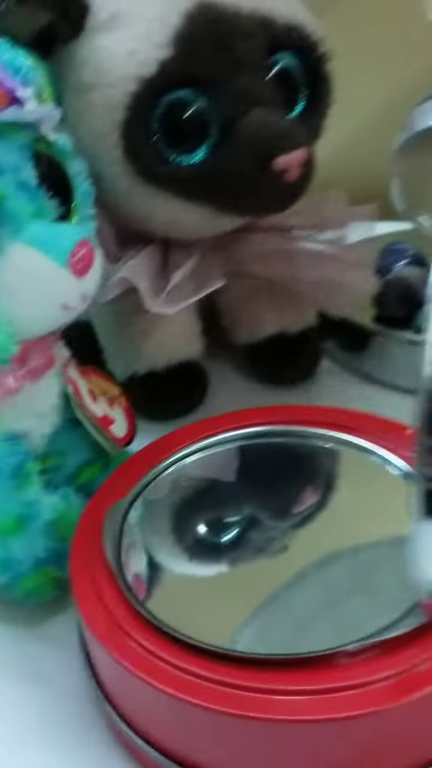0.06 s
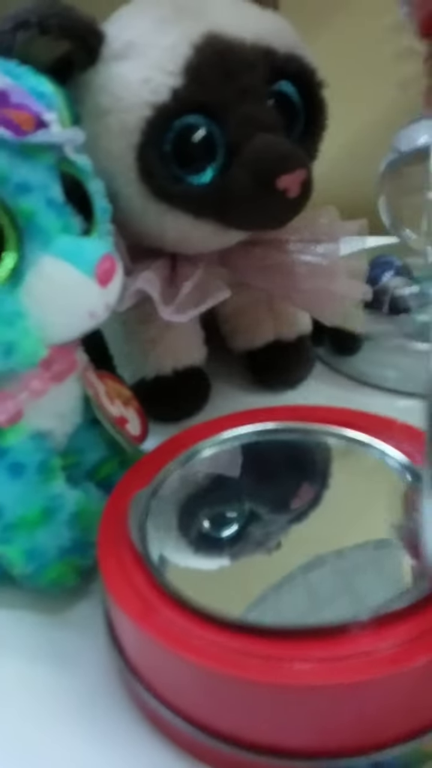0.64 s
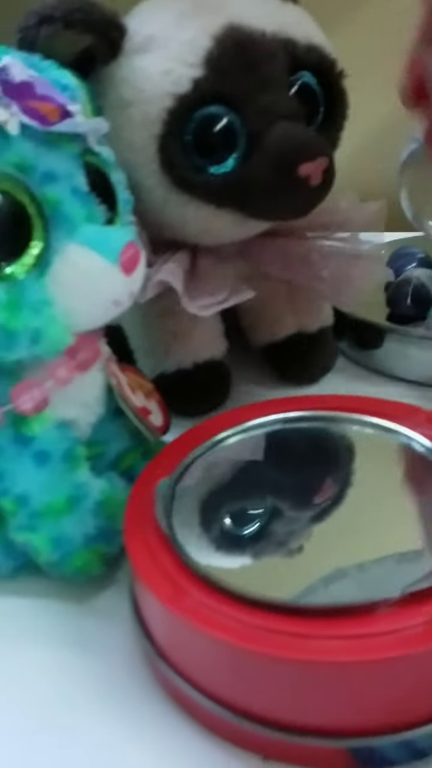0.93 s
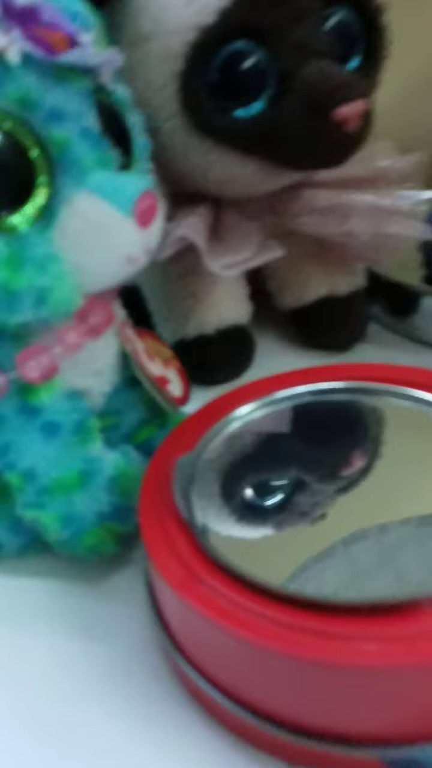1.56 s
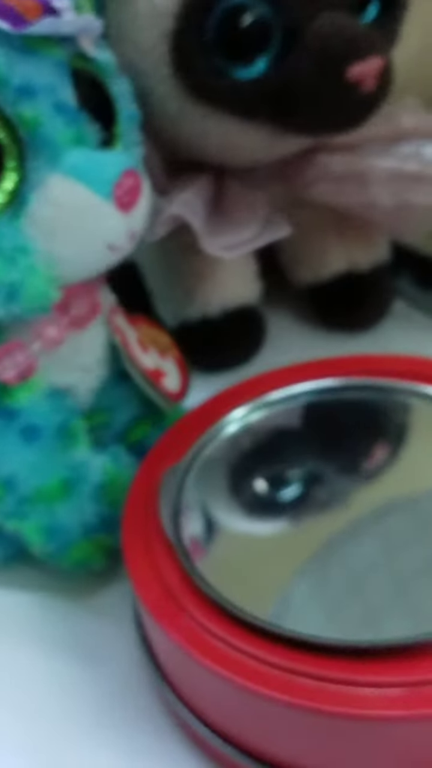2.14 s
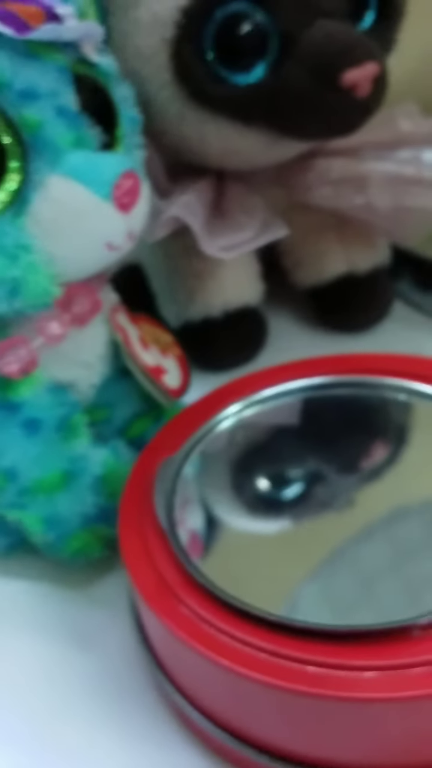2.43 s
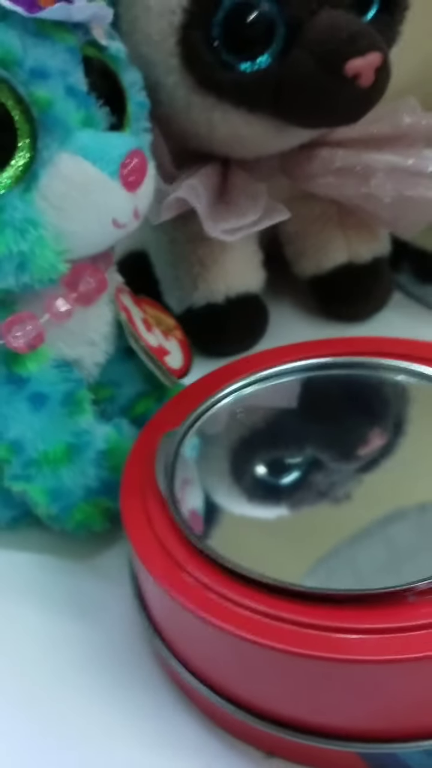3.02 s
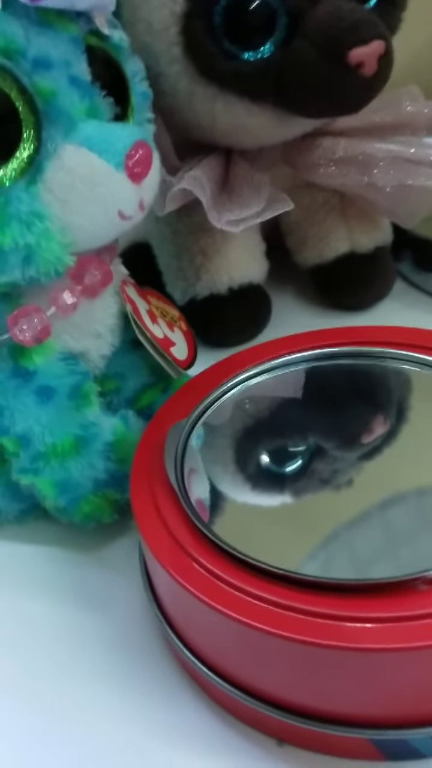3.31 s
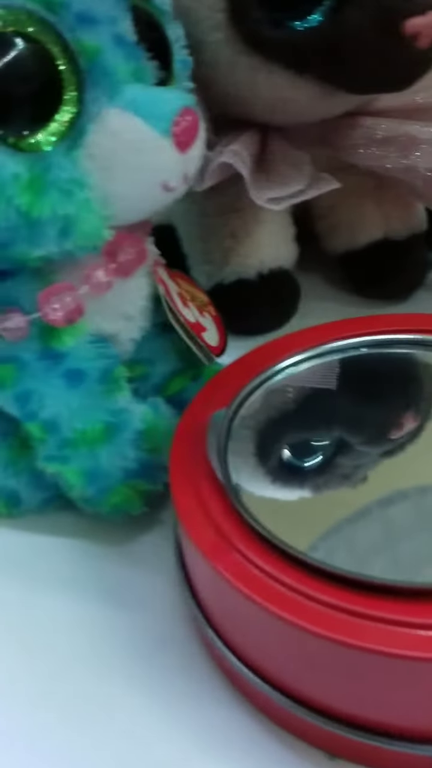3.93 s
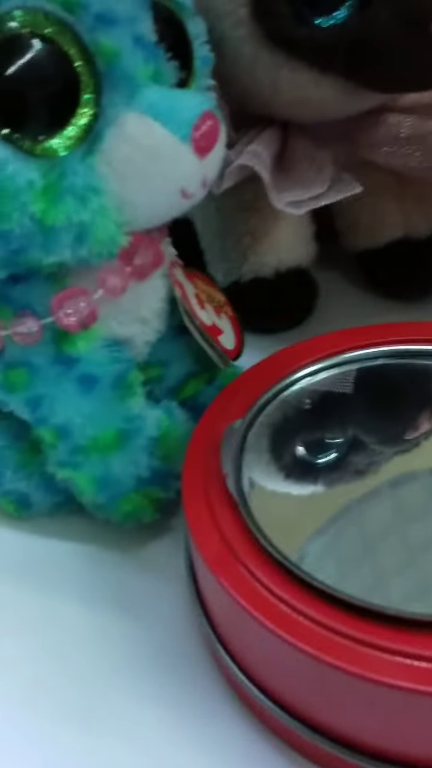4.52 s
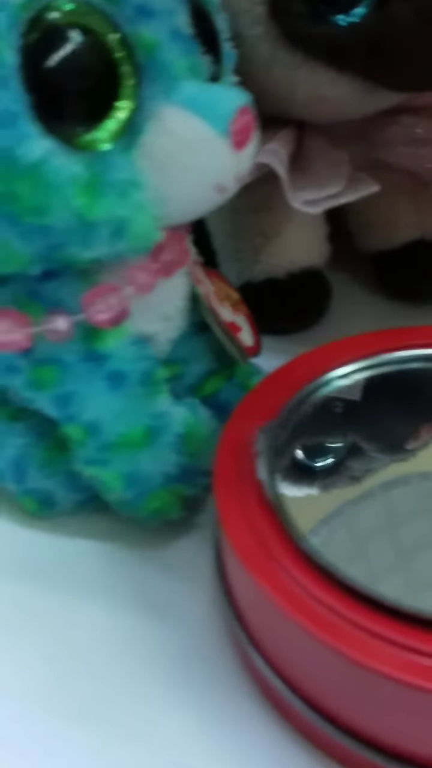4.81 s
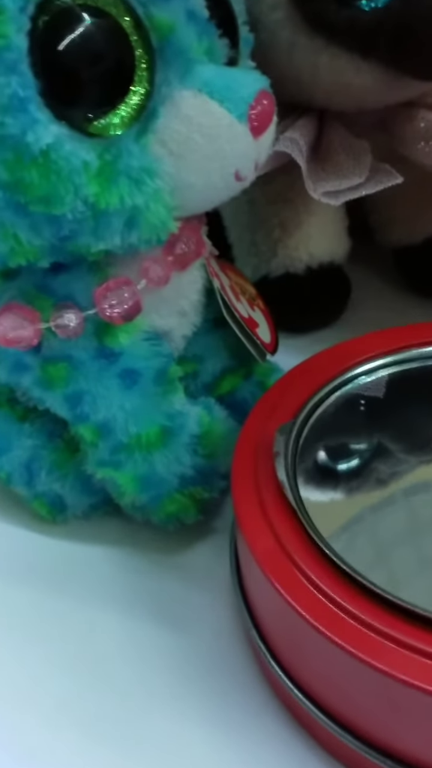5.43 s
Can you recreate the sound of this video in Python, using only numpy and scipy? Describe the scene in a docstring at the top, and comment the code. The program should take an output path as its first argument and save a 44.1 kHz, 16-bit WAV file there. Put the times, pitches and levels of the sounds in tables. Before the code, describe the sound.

Close to a stereo microphone in a small, quiet room, hands move trinkets about on a table. A cluster of metallic clinks sounds on the right as beads land in a tin, followed by uneven scraping and soft bumps. Sparse little clicks give way to a quick, dry clatter of beads. Last, a tin lid lands sharply near the centre, wobbles on its rim and scrapes along. A faint hum lies behind.

```python
"""Beads and small tins on a table

Close up, a little right of a stereo microphone, beaded trinkets roll, click and rub. Beads drop into
an open metal tin, which rings and then scrapes in tiny slips as it is pushed along; later a lid is
clapped down and slid over the table. Hands brush about, and soft bumps wake the table top's low modes.
A small, quiet room with a low hum lies behind."""
import sys
import numpy as np
from scipy import signal
from scipy.fft import rfft, irfft, next_fast_len
from scipy.io import wavfile
from scipy.ndimage import uniform_filter1d

SR = 44100
rng = np.random.default_rng(int(sys.argv[2]) if len(sys.argv) > 2 else 0)


def log_audio(samples):
    """Write samples as a 16-bit WAV file to the path given in sys.argv[1]."""
    # one column per channel
    frames = np.atleast_2d(samples).T
    # limit to full scale, then quantise
    limited = np.clip(frames, -1, 1)
    pcm = np.round(limited * 32767).astype(np.int16)
    wavfile.write(sys.argv[1], SR, pcm)


N = 245240
TIME = np.arange(N) / SR


def amp(db):
    """Decibels to gain."""
    return 10 ** (np.asarray(db) / 20)


def unit_rms(x):
    """Scales to rms 1."""
    return x / np.sqrt(np.mean(x ** 2) + 1e-20)


def curve_at(points, hz):
    """Reads a table on a log-frequency axis."""
    f, value = np.transpose(points)
    return np.interp(np.log(hz + 1), np.log(f + 1), value)


def add(mix, start_s, sound):
    """Mixes a stereo sound in at its start time."""
    part = mix[:, max(round(start_s * SR), 0):][:, :sound.shape[1]]
    part += sound[:, :part.shape[1]]


def placed(x, right_db):
    """Leans a sound to the right of the microphone."""
    return x * amp([[-right_db / 2], [right_db / 2]])


def wavering(db, size):
    """A random gain that drifts over `size` samples."""
    return amp(db * unit_rms(uniform_filter1d(rng.standard_normal(N), size)))


def strokes(rows, attack_s, release_db_per_s):
    """Pressure over time: each stroke builds up, lasts for its length and dies away."""
    power = np.zeros(N)
    for start, length, db in rows:
        rise = np.clip((TIME - start) / attack_s, 0, 1)
        power += (rise * amp(db - release_db_per_s * np.maximum(TIME - start - length, 0))) ** 2
    return np.sqrt(power)


# Likeness of left and right at the microphone: f/Hz, coherence
MIC_COHERENCE = [(50, .9), (800, .985), (2500, .84), (5000, .55), (15000, .5)]


def stereo_noise(size, lag=0):
    """White noise at two microphone ports, most alike in the bass; the left is `lag` samples late."""
    padded = next_fast_len(size)
    hz = np.fft.rfftfreq(padded, 1 / SR)
    right, unrelated = np.exp(2j * np.pi * rng.random((2, len(hz))))
    coherence = np.clip(curve_at(MIC_COHERENCE, hz), 0, 1)
    left = coherence * right + np.sqrt(1 - coherence ** 2) * unrelated
    left *= np.exp(-2j * np.pi * hz * lag / SR)
    return unit_rms(irfft(np.array([left, right]), padded)[:, :size])


def coloured_noise(colour):
    """Steady stereo noise with a given spectrum."""
    gain = amp(curve_at(colour, np.fft.rfftfreq(N, 1 / SR)))
    return irfft(rfft(stereo_noise(N)) * gain, N)


def resonator(colour, modes, treble_db, body_db, size=8192):
    """An object's impulse response: modes on a broad colour, with unit gain over 1.5-5 kHz."""
    hz = np.fft.rfftfreq(size, 1 / SR)
    peaks = 1 + sum((amp(db) ** 2 - 1) / (1 + (2 * (hz - f) / width) ** 2) for f, width, db in modes)
    shelves_db = treble_db / (1 + (5200 / (hz + 1)) ** 4) + body_db / (1 + (hz / 1650) ** 10)
    gain = amp(curve_at(colour, hz) + shelves_db) * np.sqrt(np.maximum(peaks, .1))
    gain /= np.sqrt(np.mean(gain[(hz > 1500) & (hz < 5000)] ** 2))
    cepstrum = irfft(np.log(gain))
    cepstrum[1:size // 2] *= 2  # minimum phase, so the ring follows the contact
    cepstrum[size // 2 + 1:] = 0
    return irfft(np.exp(rfft(cepstrum)))


def knocks(rows, colour, modes, body_db, rise_s, crack_s, ring_s, ring_db, detune, lag, size=4096):
    """Each contact is a short crack and a dense dying ring, its modes a little different each time."""
    scatter_db, body_per_treble = 2, 0.13  # a sharp contact has more low knock and less ring
    out, t = np.zeros((2, N)), np.arange(size) / SR
    envelope = (1 - np.exp(-t / rise_s)) * (np.exp(-t / crack_s) + amp(ring_db) * np.exp(-t / ring_s))
    for start, db, treble_db in rows:
        struck = [(f * (1 + detune * rng.normal()), width, height + scatter_db * rng.normal())
                  for f, width, height in modes]
        response = resonator(colour, struck, treble_db, body_db + body_per_treble * treble_db)
        crack = stereo_noise(size, lag) * envelope
        crack *= np.sqrt(.005 * SR / np.sum(crack ** 2, 1, keepdims=True))  # energy of 5 ms at rms 1
        add(out, start, amp(db) * signal.fftconvolve(crack, response[None], axes=1))
    return out


def friction(pressure, response, slips_per_s, spread_db, clump_db, smooth, lag):
    """Tiny uneven slips come in clumps over smooth rubbing; lighter pressure sounds duller."""
    slipping = rng.random(N) < slips_per_s / SR
    strength = amp(spread_db * np.minimum(rng.exponential(1, N), 2))
    slips = slipping * strength * wavering(clump_db, size=500)
    power = signal.lfilter([1], [1, -np.exp(-2000 / SR)], slips ** 2)  # each slip lasts about 1 ms
    drive = unit_rms(stereo_noise(N, lag) * np.sqrt(power + smooth * power.mean())) * pressure
    dull = signal.sosfiltfilt(signal.butter(1, 4500, fs=SR, output="sos"), drive)
    treble = (drive - dull) * (pressure / pressure.max()) ** 0.42
    return signal.oaconvolve(dull + treble, response[None], axes=1)[:, :N]


# Room tone behind the table: f/Hz, relative level/dB
ROOM_TONE_COLOUR = [(20, -24), (55, 0), (85, -7.5), (130, -5.5), (200, -16.5), (450, -21.5), (1200, -29.5),
                    (3000, -33), (15500, -32)]


def room_tone():
    """Low room rumble, a faint electric hum and microphone hiss."""
    hum_hz = 120.2
    air = unit_rms(coloured_noise(ROOM_TONE_COLOUR))
    hum = unit_rms(np.sin(2 * np.pi * hum_hz * TIME))
    return placed(amp(-70) * air + amp(-72.5) * hum, right_db=6.0)


# Hands brushing the table and soft toys, close by: t/s, length/s, level/dB
HAND_STROKES = [(0, 0.41, -67.5), (.7, 0.02, -50), (.87, 0.29, -61), (1.36, .24, -55.5),
                (2.17, 0.11, -63.5), (2.88, 0.45, -77), (4.16, 0.37, -59), (4.3, 0.29, -58.5),
                (4.78, 0.66, -64.5)]


def hands():
    """Dull, uneven brushing of skin and cloth."""
    colour = [(30, -24.5), (120, 9), (350, 2), (700, -5), (1300, -22.5), (3000, -16.5), (15000, -31)]
    rub = unit_rms(coloured_noise(colour) * wavering(2, size=1200))
    pressure = strokes(HAND_STROKES, attack_s=0.09, release_db_per_s=172)
    return placed(rub * pressure, right_db=6.5)


# Broad spectrum of the beads, close up: f/Hz, relative level/dB
BEAD_SPECTRUM = [(100, -21.5), (450, -4.5), (1200, -16.5), (2000, -15.5), (3500, -10.5), (6000, -1),
                 (10000, 3.5), (14500, 5), (16500, -22)]
# Their resonances and one notch: f/Hz, width/Hz, height/dB
BEAD_RESONANCES = [(1960, 170, -22), (2406, 214, 24), (2567, 600, 26), (3600, 250, 10.5), (8030, 160, 13.5),
                   (12000, 1700, 0.5)]
# Beads rolling over each other: t/s, length/s, level/dB
BEAD_ROLLING = [(.2, 0.14, -68), (.703, 0.02, -49.5), (2.2, 0.15, -69.5), (3.1, 0.23, -69.5),
                (4.21, 0.21, -55.5), (4.315, 0.3, -42.5), (4.745, 0.035, -48.5)]
# Beads clicking together: t/s, level/dB, treble/dB
BEAD_CONTACTS = [(.2119, -51.5, 20.5), (.2364, -51.5, 10), (.7053, -44, -7.5), (2.1051, -62.5, 14),
                 (2.1745, -59.5, 15), (2.2423, -51.5, -3.5), (2.361, -37.5, -7), (3.0914, -50, -7),
                 (3.1283, -52.5, -2.5), (3.1976, -49, 4.5), (3.2645, -38, -0.5), (3.3079, -39, -10),
                 (4.1657, -43.5, -16), (4.2146, -29, -10), (4.3378, -22.5, -6), (4.364, -24.5, -13),
                 (4.385, -16, -9), (4.3932, -20, -3), (4.4416, -30, -3), (4.456, -30.5, -1),
                 (4.466, -35, -3), (4.49, -26.5, -2), (4.4952, -24, -5), (4.5125, -27, 4),
                 (4.5186, -20, -3.5), (4.553, -22, 0.5), (4.569, -25.5, -11), (4.6042, -39.5, -3),
                 (4.6556, -41, -2), (4.7533, -46.5, 4.5), (4.8347, -47, 2.5)]


def beads():
    """Hard beads just right of centre: bright, dry clicks and a loose rattle as they roll."""
    clicks = knocks(BEAD_CONTACTS, BEAD_SPECTRUM, BEAD_RESONANCES, body_db=-6.5,
                    rise_s=.0007, crack_s=.0017, ring_s=.009, ring_db=-21, detune=.04, lag=3)
    response = resonator(BEAD_SPECTRUM, BEAD_RESONANCES, treble_db=-4.5, body_db=8)
    pressure = strokes(BEAD_ROLLING, attack_s=.01, release_db_per_s=245.5)
    rattle = friction(pressure, response, slips_per_s=200, spread_db=4.5, clump_db=3.5, smooth=.06, lag=3)
    return placed(clicks + rattle, right_db=3.5)


# Beads rubbing, at the same spot: t/s, length/s, level/dB, f/Hz
BEAD_RUBBING = [(0.242, 0.067, -56.5, 2670), (0.341, 0.0083, -54, 2640), (2.337, 0.027, -57.5, 2430),
                (2.464, 0.1, -75, 2490), (4.16, 0.047, -62, 2650), (4.487, 0.084, -45.5, 2500)]


def bead_chatter(width_hz=620):
    """Beads stick and slip against each other, each rub ringing at its own pitch."""
    slips = friction(np.ones(N), np.ones(1), slips_per_s=170, spread_db=3, clump_db=1.5,
                     smooth=.15, lag=3)
    out = np.zeros((2, N))
    for start, length, db, hz in BEAD_RUBBING:
        b, a = signal.iirpeak(hz, hz / width_hz, fs=SR)
        ring = unit_rms(signal.lfilter(b, a, signal.lfilter(b, a, slips)))
        out += ring * strokes([(start, length, db)], attack_s=0.0031, release_db_per_s=562)
    return placed(out, right_db=3.5)


# Low modes of the table top: f/Hz
TABLE_MODES = [85, 137, 172, 206, 280, 320, 470, 505, 590, 660, 880, 1005]
# Hands and tins bumping it, near right: t/s, level/dB, centre f/Hz
TABLE_BUMPS = [(0.734, -59, 178), (.945, -40.5, 422), (1.356, -38.5, 248), (1.375, -48, 132),
               (1.534, -46.5, 600), (3.004, -72, 750), (3.197, -67, 1250), (4.258, -51, 149),
               (4.364, -45.5, 680), (4.602, -54.5, 650), (4.792, -40, 224), (4.892, -45.5, 604),
               (4.933, -41, 174), (4.944, -44, 467), (5.007, -44.5, 186), (5.534, -47.5, 715)]


def table_bumps(t60_s=.18, size=16384):
    """A soft blow gives a dull thud and wakes the table's modes around a centre set by its softness."""
    out, t, hz = np.zeros((2, N)), np.arange(size) / SR, np.array(TABLE_MODES)
    envelope = (1 - np.exp(-t / 0.0023)) * amp(-60 * t / t60_s)
    for start, db, centre_hz in TABLE_BUMPS:
        weights = 1 / (1 + (np.log(hz / centre_hz) / 0.45) ** 2)
        detuned_hz = hz * rng.normal(1, 0.026, len(hz))
        modes = np.sin(2 * np.pi * (np.outer(detuned_hz, t) + rng.random((len(hz), 1))))
        band = signal.butter(3, [centre_hz / 3, centre_hz * 1.79], "bandpass", fs=SR, output="sos")
        toneless = signal.sosfilt(band, stereo_noise(size))
        thud = (unit_rms(weights @ modes) + amp(-4) * unit_rms(toneless)) * envelope
        onset_rms = np.sqrt(np.mean(thud[:, t < .03] ** 2))
        add(out, start, amp(db) * thud / onset_rms)
    return placed(out, right_db=6.5)


# Broad spectrum of the open tin, close and furthest right: f/Hz, relative level/dB
TIN_SPECTRUM = [(100, -30.5), (450, -11), (1300, -8.5), (2800, -2), (5000, -4), (8500, -5), (10500, -12.5),
                (13000, -4), (16000, -18)]
# Its resonances: f/Hz, width/Hz, height/dB
TIN_RESONANCES = [(1080, 35, 8), (1760, 45, 9), (1975, 45, 16), (2530, 55, 16), (3040, 110, 8),
                  (3450, 45, 11), (3820, 60, 8), (4380, 90, 7)]
# Knocks on the tin: t/s, level/dB, treble/dB
TIN_CONTACTS = [(.8674, -21.5, -0.5), (.881, -24, -11.5), (.9258, -36, 1), (.9432, -22, 4),
                (.947, -20, 1.5), (.968, -27.5, 1.5), (1.0712, -27, 1), (1.2211, -32, -10.5),
                (1.4985, -31.5, 0), (1.508, -33.5, 13.5), (1.5504, -39, 9.5), (1.5823, -29, -2.5)]
# The tin pushed over the table: t/s, length/s, level/dB
TIN_SLIDES = [(.95, 0.084, -42.5), (1.07, 0.087, -39), (1.19, 0.085, -44.5), (1.3, 0.23, -45),
              (1.49, 0.14, -44), (1.69, 0.059, -48), (2.13, 0.17, -66.5), (3.12, 0.14, -64)]


def tin():
    """The open tin rings when beads land in it, and its rim scrapes along the table."""
    hits = knocks(TIN_CONTACTS, TIN_SPECTRUM, TIN_RESONANCES, body_db=5.5,
                  rise_s=.0005, crack_s=.0016, ring_s=.014, ring_db=-20, detune=0, lag=0)
    rim = resonator(TIN_SPECTRUM, TIN_RESONANCES, treble_db=-6, body_db=7.5)
    pressure = strokes(TIN_SLIDES, attack_s=0.009, release_db_per_s=363)
    scrape = friction(pressure, rim, slips_per_s=650, spread_db=3.5, clump_db=2, smooth=.45, lag=0)
    return placed(hits, right_db=10.5) + placed(scrape, right_db=8.5)


# Broad spectrum of the lid, close and almost straight ahead: f/Hz, relative level/dB
LID_SPECTRUM = [(100, -52), (500, -6), (1100, -1.5), (1550, -4.5), (2000, -1.5), (3200, 3), (5000, -3),
                (8500, -2.5), (10200, -10), (12500, -8.5), (16000, -20)]
# Its resonances: f/Hz, width/Hz, height/dB
LID_RESONANCES = [(490, 35, 8), (880, 16, 11), (1000, 30, 5), (1260, 60, 10), (1845, 30, 12),
                  (1963, 32, 15.5), (2140, 55, 9), (2560, 90, 9), (3090, 160, 8), (3380, 55, 10),
                  (6950, 70, 8)]
# The lid landing and chattering: t/s, level/dB, treble/dB
LID_CONTACTS = [(4.894, -45, 25), (4.9279, -37, 1), (4.9442, -13, 8.5), (4.9545, -15, -10),
                (4.963, -33, -19), (4.9985, -19.5, 6), (5.002, -20.5, -20), (5.035, -23, -2),
                (5.05, -26, 6), (5.0666, -25, 0.5), (5.2023, -33, -3), (5.2193, -24.5, -2),
                (5.3026, -28.5, -7), (5.351, -35, -10), (5.4059, -37, -3), (5.5386, -35.5, 18)]
# The lid pushed over the table: t/s, length/s, level/dB
LID_SLIDES = [(5.04, 0.046, -39.5), (5.11, 0.043, -44.5), (5.22, 0.21, -45.5), (5.455, 0.21, -37.5)]


def lid():
    """The metal lid claps down, chatters on its rim and slides."""
    hits = knocks(LID_CONTACTS, LID_SPECTRUM, LID_RESONANCES, body_db=2.5,
                  rise_s=.0001, crack_s=.0045, ring_s=.012, ring_db=-15.5, detune=0, lag=-1.7)
    rim = resonator(LID_SPECTRUM, LID_RESONANCES, treble_db=-11, body_db=2.5)
    pressure = strokes(LID_SLIDES, attack_s=0.004, release_db_per_s=306)
    scrape = friction(pressure, rim, slips_per_s=1000, spread_db=3.5, clump_db=3, smooth=.5, lag=-1.5)
    return placed(hits + scrape, right_db=2.0)


# Reverberation of the room around the table: f/Hz, T60/s
ROOM_DECAY = [(150, 0.2), (3000, 0.17), (15000, 0.12)]


def room_reverb(x, build_s=0.0063, size=22050):
    """A small room returns a diffuse tail whose treble dies first."""
    hz, t, spectra = signal.stft(stereo_noise(size), SR, nperseg=256)
    decay = amp(-60 * t / curve_at(ROOM_DECAY, hz)[:, None])
    tail = signal.istft(spectra * decay, SR, nperseg=256)[1]
    tail *= np.minimum(np.arange(tail.shape[1]) / SR / build_s, 1) ** 2
    return signal.fftconvolve(x, tail / np.linalg.norm(tail[0]), axes=1)[:, :N]


def scene():
    """At the microphone: mostly direct sound from the table, with a little of the room."""
    direct = beads() + bead_chatter() + tin() + lid() + table_bumps() + hands()
    return direct + amp(-13.5) * room_reverb(direct) + room_tone()


def record(dry):
    """The recorder's band limit cuts the highest treble."""
    lowpass = signal.firwin(255, cutoff=15800, window=("kaiser", 8), fs=SR)
    return signal.oaconvolve(dry, lowpass[None], "same")


dry = scene()
out = record(dry)
log_audio(out)
```